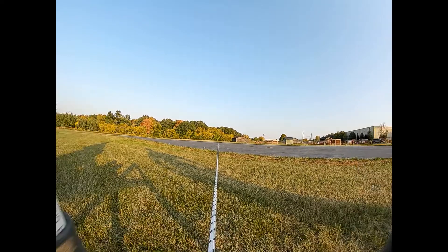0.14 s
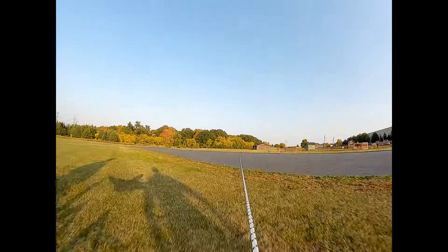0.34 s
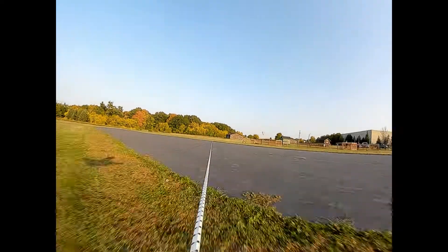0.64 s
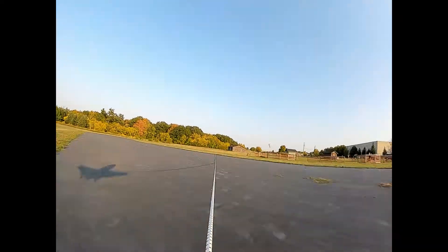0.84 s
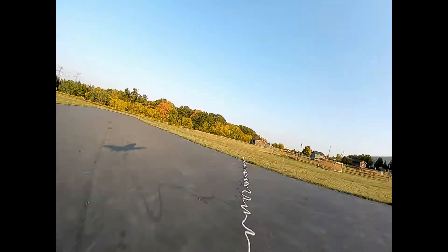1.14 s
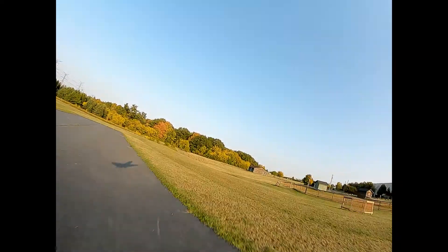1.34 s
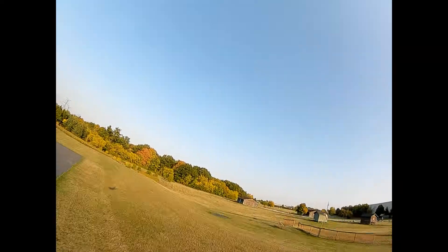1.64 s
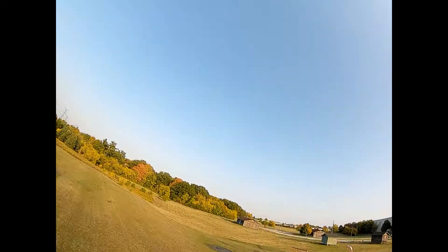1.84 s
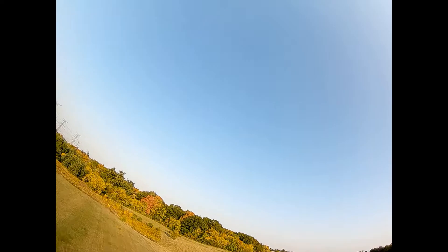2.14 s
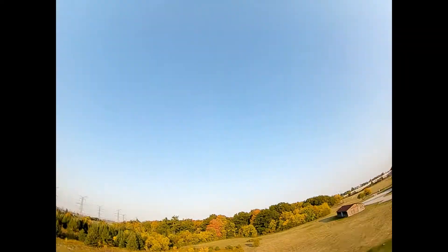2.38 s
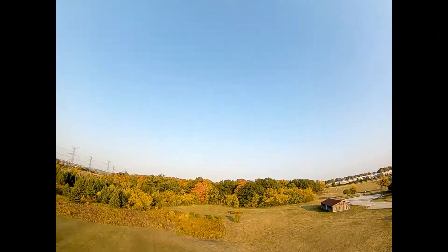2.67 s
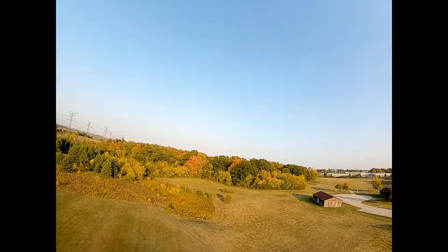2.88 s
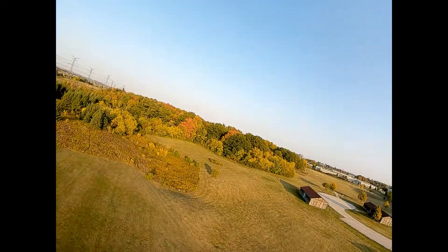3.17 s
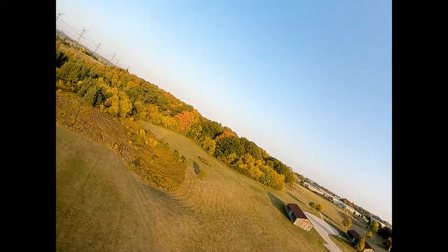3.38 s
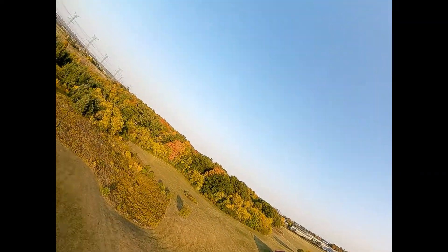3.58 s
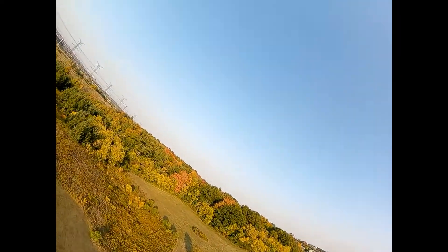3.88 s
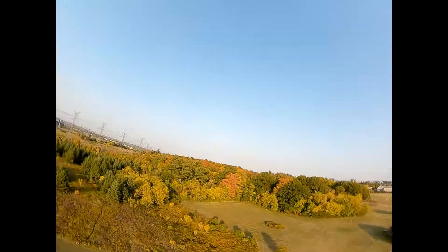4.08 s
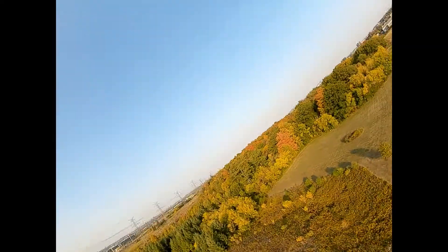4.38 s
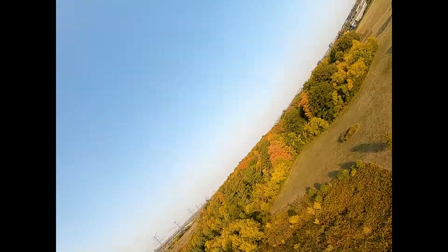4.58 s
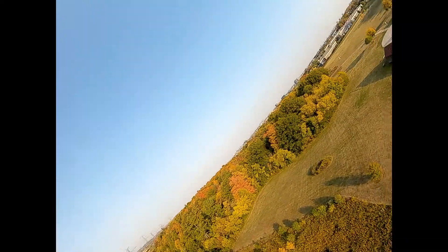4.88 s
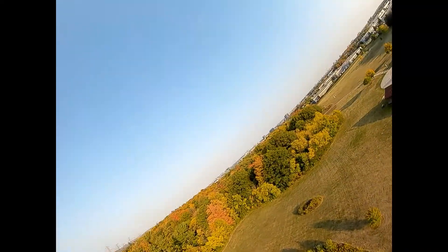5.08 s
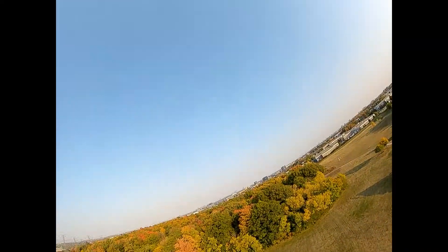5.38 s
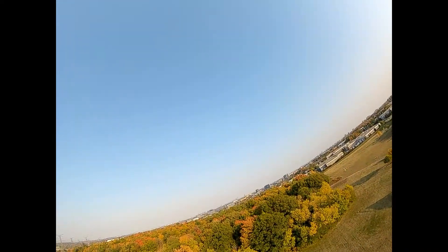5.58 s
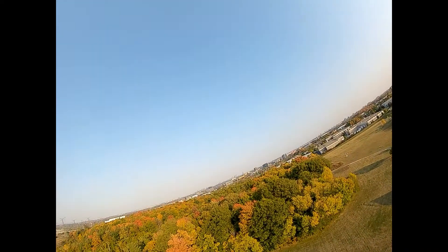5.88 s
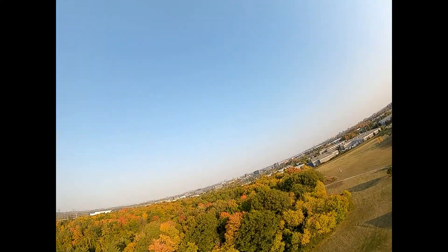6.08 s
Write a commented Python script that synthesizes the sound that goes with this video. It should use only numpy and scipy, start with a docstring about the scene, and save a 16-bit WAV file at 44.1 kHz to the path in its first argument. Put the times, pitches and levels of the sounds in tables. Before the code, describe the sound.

A small electric model plane knocks along its launch rails, then its motor whines up to a steady propeller drone in gusty wind.

```python
"""Model plane launch, heard on board

A bungee pulls a small electric plane off a plastic-pipe ramp; it scrapes and knocks on the rails.
The brushless motor speeds up while its controller whistles. Then shaft and propeller drone through
the foam body as rough air buffets it, with now and then a hollow hoot."""
import sys
import numpy as np
from scipy import signal
from scipy.fft import rfft, irfft, next_fast_len
from scipy.io import wavfile
from scipy.ndimage import uniform_filter1d

SR = 44100
rng = np.random.default_rng(int(sys.argv[2]) if len(sys.argv) > 2 else 0)


def dump_mix(stems):
    """Bounce the given channels to the path in sys.argv[1] as a 16-bit WAV at rate SR."""
    frames = np.atleast_2d(stems).T  # one column per channel
    limited = np.clip(frames, -1, 1)  # hard clip at full scale
    pcm = np.round(limited * 32767).astype(np.int16)
    wavfile.write(sys.argv[1], SR, pcm)


N = 274408
T = np.arange(N) / SR
MOTOR_START_S, FULL_THROTTLE_S = 0.584, 1.125
# Gusts in flight; each sound takes its own share: time_s, body_db, propeller_db, hiss_db
GUSTS = [(1.2, 3, 1, 1), (1.32, 5, 6.5, 2.5), (1.45, 2, -2, 2), (1.7, -0.5, -2.5, 1), (1.9, -1.5, -1, 4),
         (2.08, 1.5, 5, 4), (2.22, 2, 1, 2), (2.33, 2.5, -2.5, -0.5), (2.47, -1, -5.5, 0),
         (2.67, 2.5, 4.5, 3.5), (2.95, -1.5, -3.5, 0), (3.2, 0, -0.5, 1.5), (3.45, 6, 7.5, 3.5),
         (3.7, 1, 3, 3.5), (3.9, 3, 6, 5), (4.08, 2.5, 3, 5.5), (4.2, -5, -3, -2), (4.35, 2.5, 0.5, 1),
         (4.43, 10, 9.5, 7.5), (4.75, 10, 8, 4.5), (4.95, -0.5, -2, 1), (5.28, 1, 5, 3.5),
         (5.5, 3, -1.5, 1), (5.7, 0.5, -4, -3), (5.95, 1.5, -1, -1.5), (6.2, 6, 8.5, 7)]


def undb(db):
    """Turn decibels into a gain."""
    return 10 ** (np.asarray(db) / 20)


def curves(table):
    """Join a table's timed points into one line per column."""
    times, *columns = np.transpose(table)
    return [np.interp(T, times, column) for column in columns]


def wander(rate_hz):
    """A smooth random wobble, about 1 in size."""
    hold = int(SR / rate_hz)
    steps = np.repeat(rng.standard_normal(N // hold + 1), hold)
    return 1.237 * uniform_filter1d(uniform_filter1d(steps, hold), hold)[:N]


def tone(turns, db):
    """A sine wave at an average (rms) level, starting anywhere in its cycle."""
    return np.sqrt(2) * undb(db) * np.sin(2 * np.pi * (turns + rng.random()))


def noise(points, pulse=1):
    """Noise of rms 1, shaped by (pitch_hz, level_db) points and falling away outside them."""
    hz, db = np.transpose(points)
    size = next_fast_len(N)
    log_hz = np.log(np.fft.rfftfreq(size, 1 / SR) + 1)
    shape_db = np.interp(log_hz, np.log(np.r_[hz[0] / 2, hz, hz[-1] * 4]),
                         np.r_[db[0] - 20, db, db[-1] - 70])
    shaped = irfft(rfft(pulse * rng.standard_normal(N), size) * undb(shape_db), size)[:N]
    return shaped / np.sqrt(np.mean(shaped ** 2))


def shaft():
    """Shaft speed and turns so far; it trembles most while the slow rotor tugs past the magnets."""
    speed = [(.58, 12.6), (.724, 55.3), (.796, 83.8), (.868, 123), (.976, 173.8), (1.012, 193.4),
             (1.048, 205.7), (1.084, 210.7), (1.16, 215.65), (1.25, 217.1), (1.3, 216.43), (1.36, 214),
             (1.45, 213.41), (2, 212.16), (2.6, 210.31), (2.8, 208.65), (3.52, 208.65), (3.62, 211.8),
             (3.75, 212), (3.9, 211.38), (4.3, 212.86), (4.6, 213.35), (5.1, 212.31), (5.3, 212.58),
             (5.7, 212.01), (5.9, 210.89), (6.17, 211.05)]  # how fast it spins: time_s, speed_hz
    hz = uniform_filter1d(curves(speed)[0], size=900)
    hz = hz * (1 + 0.00046 * wander(14) + 0.0093 * (1 - hz / hz.max()) * wander(120))
    return hz, np.cumsum(hz) / SR


def motor(hz, turns):
    """Tones at k times the shaft speed: unbalance and blades drone, magnets passing coils whine."""
    strain = {5: 2, 7: 3, 8: 3.3, 10: 2.4, 12: 9.3, 16: 11, 18: 8, 24: 9.9, 28: 16, 30: 17, 34: 15}  # tones that grow while the motor pulls hard: multiple, extra_db
    rising, flying = run_up_levels(hz), flight_levels()
    in_flight = np.clip((T - FULL_THROTTLE_S) / 0.059 + 1, 0, 1)
    spin_db = 32 * np.log10(hz / hz.max())  # forces grow with speed
    chopping = np.clip((1.06 - T) / 0.063, 0, 1)  # the current turns smooth at full throttle
    # uneven magnets wobble the high tones once and twice a turn
    wobble = chopping * .4 * (np.sin(2 * np.pi * turns) + np.sin(4 * np.pi * turns)) / (2 * np.pi)
    out = 0
    for k in sorted({*rising, *flying}):
        flight_db = flying.get(k, -110)
        strain_db = chopping * (strain.get(k, 0) + .6 * body_boost_db(k * hz))
        early_db = rising.get(k, flight_db + spin_db + strain_db)
        db = (1 - in_flight) * early_db + in_flight * flight_db
        rasp_db = 4 * chopping * wander(110.45) if k > 6 else 0
        flutter_db = (.7 if k in (1, 42) else 2.6) * wander(32)  # uneven air meets the blades
        out = out + tone(k * turns + (k > 12) * wobble, db + flutter_db + rasp_db)
    return np.clip((T - MOTOR_START_S) / 0.018, 0, 1) * out


def body_boost_db(hz):
    """The foam body carries some pitches of the motor better than others."""
    mount = [(60, -12), (130, 7.5), (165, -4.5), (220, 4), (250, -1), (300, 6.5), (350, 0.5), (415, -17),
             (560, -5), (800, 0), (1200, -13), (1780, 3), (2250, 1), (2800, -2.5), (3450, 4), (4000, -5),
             (4500, 4), (5200, 3.5), (5800, -15), (6600, -5), (7300, -12.5), (8900, -9)]  # path from motor to microphone: pitch_hz, boost_db
    pitch_hz, boost_db = np.transpose(mount)
    return np.interp(np.log(hz), np.log(pitch_hz), boost_db)


def run_up_levels(hz):
    """Each rising tone swells and dips as it sweeps through the body's resonances."""
    # Rising tones: multiple, (base_at_half_speed_db, growth_db_per_doubling)
    run_up = {1: (-50.5, 12.3), 2: (-48, 6.8), 3: (-53.5, 0), 4: (-49.5, 0), 6: (-57, 3), 14: (-62, -2),
              21: (-53.5, -2.2), 42: (-54, -3.5), 63: (-68, -4)}
    shudder = [(.58, -13), (.64, -12), (.7, 7.5), (.735, 4.5), (.79, -14.5), (.86, 1.5), (.92, 3),
               (1.08, 2)]  # low tones shake as the rotor catches: time_s, change_db
    # Magnet tones are weaker until the controller chops faster: multiple, change_db
    soft_start = {21: -14, 42: -8.5, 63: -14}
    soft = np.clip((.75 - T) / 0.016, 0, 1)
    shudder_db = curves(shudder)[0]
    fade_db = -110 * np.maximum(T - 0.92, 0)  # two tones die away as the throttle opens
    return {k: db + growth * np.log2(2 * hz / hz.max()) + body_boost_db(k * hz)
            + (k <= 6) * shudder_db + soft_start.get(k, 0) * soft + (k in (21, 63)) * fade_db
            for k, (db, growth) in run_up.items()}


def flight_levels():
    """In flight every motor tone wavers, and the strong ones also swell with the gusts."""
    strong = {1: (-34.5, 0.063, 0.68), 2: (-43.5, 0.58, 1.35), 3: (-48.5, 0.06, 1.3),
              4: (-50.5, 0.089, 1.5), 8: (-50, .2, 1.4), 10: (-49, 0.071, 1.3), 42: (-65, .05, .8)}  # main tones: multiple, (level_db, gust_share, waver_db)
    weak = {5: -58, 6: -57, 7: -61, 9: -57, 11: -59.5, 12: -62, 13: -65, 14: -70, 16: -72, 17: -78.5, 18:
            -69.5, 20: -80, 21: -77.5, 22: -79, 23: -81, 24: -78, 26: -80, 28: -81.5, 30: -85.5, 31: -87.5,
            34: -87.5, 70: -102}  # faint tones: multiple, level_db
    # Multiples 2, 3 and 4 swell by turns: time_s, second_db, third_db, fourth_db
    swells = [(1.12, -5, -3, -6), (1.3, 6, 3.5, 3), (1.42, 3, 3.5, 4.5), (1.6, -1.5, -1.5, -7),
              (1.88, 0.5, -9, 9), (2.02, -4.5, 7, -4), (2.14, -3, 0, 7.5), (2.28, -9.5, -7.5, -1.5),
              (2.47, 0, 2, -17), (2.62, 2, -4, 2.5), (2.92, -5.5, 3, 1.5), (3.25, 1.5, 1, 3.5),
              (3.55, 2, 9, 2.5), (3.75, -1, 3.5, 9.5), (3.93, 1.5, 6, 2), (4.05, 2, -17, 6),
              (4.32, 4, 6, -4), (4.6, 5.5, 0.5, -10), (4.85, 4, 3.5, -7), (5.05, -1, 1.5, 0.5),
              (5.3, -0.5, 3, 8), (5.5, -7, -1, -6.5), (5.62, -2, 1.5, -8), (5.8, 3.5, 0.5, -2),
              (5.92, -1.5, 2.5, -9), (6.05, 4, 6, 4), (6.22, 6.5, 2.5, 1)]
    buzz = [(1.12, -4.5), (1.4, 1), (2.2, 0), (2.45, -9.5), (3.35, -9.5), (3.6, 0), (4.1, -1), (4.3, -9.5),
            (4.6, -4.5), (5.2, 2), (5.7, -5), (5.87, -14), (6.1, -7)]  # buzz of multiples 8 and 10: time_s, change_db
    whine = [(1.12, 0), (1.22, 4), (1.42, -4.5), (1.9, -1), (2.6, 2), (3.4, -1.5), (3.75, 1), (4.4, -4),
             (6.2, -1)]  # magnet whine, multiple 42: time_s, change_db
    gust_db, buzz_db, whine_db = (curves(table)[0] for table in (GUSTS, buzz, whine))
    second, third, fourth = curves(swells)
    change_db = {2: second, 3: third, 4: fourth, 8: buzz_db, 10: buzz_db, 42: whine_db}
    levels = {k: db + share * gust_db + waver_db * wander(6) + change_db.get(k, 0)
              for k, (db, share, waver_db) in strong.items()}
    for k, db in weak.items():  # the high ones come and go with the buzz
        levels[k] = db + 1.6 * wander(5.043) + (k > 15) * .6 * (buzz_db + 4)
    return levels


def slide_and_wind(turns):
    """Rails scrape, then wind gusts and pulses with each propeller turn; the blade tips hiss."""
    # Steady scraping as the plane slides along the rails, then wind rising as the motor speeds up:
    # time_s, rumble_db, roar_db, rush_db, hiss_db
    levels = [(0, -75, -84, -95, -99), (.12, -76, -84, -93, -99), (.15, -69, -61.5, -79, -94),
              (.42, -70, -63, -84, -95), (.5, -60, -63, -77, -99), (.56, -60, -60, -71, -86),
              (.6, -63, -58, -59, -76), (.67, -53, -60, -57, -73), (.72, -50, -51, -55, -70),
              (.78, -61, -57.5, -50.5, -62), (.9, -64, -46.5, -46.5, -55.5), (.96, -56, -48, -53, -57),
              (1.02, -55, -49.5, -43.5, -62), (1.1, -59, -55, -55.5, -72), (1.2, -62, -55, -50, -67)]
    shares = (0.49, 1.07, 1.03, 1.18)  # how much each band follows the gusts: rumble, roar, rush, hiss
    rumble = [(25, -8), (45, -4), (80, 0.5), (120, -1.5), (180, -5.5)]  # deep noise in the body: pitch_hz, level_db
    roar = [(160, -3), (280, 4), (520, 1.5), (660, -4), (735, -11.5), (820, -8.5), (950, -18)]  # rail scraping at first, later air on the body: pitch_hz, level_db
    rush = [(800, 1.5), (1000, -5), (1500, -3), (2100, -3.5), (2700, -14.5), (3400, -19)]  # higher noise, in flight from the blades: pitch_hz, level_db
    hiss = [(2900, -22), (3400, -3), (3700, -1.5), (4300, -3), (4600, -6.5), (5100, 0), (5700, -10.5),
            (6600, -8), (7100, -11), (7700, -16), (8400, -19), (9500, -22)]  # hiss through the motor mount: pitch_hz, level_db
    tip_hiss = [(8000, 0), (10000, -1.5), (12000, -4), (14000, -6), (15600, -4)]  # hiss of the blade tips: pitch_hz, level_db
    pulse_depths = (0.1, 0.23, 0.2, 0.18)
    shared_flutter_db, own_flutter_db = (0.38, 1.7, 2.1, 0.98), (2.4, 0.96, 1.1, 1.1)
    out, flutter = 0, wander(30)
    body_db, blades_db, hiss_db = curves(GUSTS) * np.clip((T - FULL_THROTTLE_S) / .08, 0, 1)
    bands = zip((rumble, roar, rush, hiss), curves(levels), (body_db, body_db, blades_db, hiss_db),
                shares, pulse_depths, shared_flutter_db, own_flutter_db)
    for points, db, gust_db, share, depth, shared_db, own_db in bands:
        band = noise(points, pulse=1 + depth * np.cos(2 * np.pi * turns))
        out = out + band * undb(db + share * gust_db + shared_db * flutter + own_db * wander(34))
    tip_db = np.interp(T, (.5, .75, 1.0), (-99, -86, -77.5))
    return out + noise(tip_hiss) * undb(tip_db + 0.53 * wander(1.2) + 1.6 * wander(8.3))


def knocks_and_ticks():
    """Each knock on the rails rings the body and scrapes briefly; ticks are tiny bursts of treble."""
    knocks = [(0.134, -61, -11, -72, 8.7), (0.153, -46.5, 7, -71, 17), (0.184, -44.5, -1.5, -53.5, 5.5),
              (0.232, -42, 7, -70, 10), (0.263, -29, -14, -47, 9.9), (0.267, -24, -5.5, -57, 11),
              (0.273, -29, -6, -63, 9.3), (0.282, -40, -6, -49, 14), (0.290, -23.5, -3.5, -43.5, 9.2),
              (0.298, -26.5, -14, -49, 6), (0.319, -35, 2, -44, 5.7), (0.328, -25, 8, -63, 5.8),
              (0.333, -32, 8, -63, 8.7), (0.355, -29, -2, -47, 13), (0.398, -36.5, 10, -67, 20),
              (0.455, -49, 9, -74, 12)]  # hits on the rails: start_s, peak_db, bass_db, scrape_db, scrape_fade_ms
    body = [(46, -10, 0.1), (117.2, 4, 0.16), (192, -13, 0.12), (265, 0, 0.075), (353, -3.5, 0.046),
            (542, -11.5, 0.036), (843, -13.5, 0.044)]  # notes the body rings at: pitch_hz, level_db, ring_s (to fall 60 dB)
    scrape = [(400, 3.5), (900, 0.5), (1900, -0.5), (2600, -13), (4000, -23.5), (7000, -30)]  # rubbing on the rails: pitch_hz, level_db
    ticks = [(0.187, -76), (0.362, -44.5), (0.412, -62), (0.416, -70), (0.511, -70), (3.513, -51)]  # sharp clicks: start_s, level_db
    rings, scrape_level, tick_level = np.zeros((3, N))
    t = np.arange(SR // 3) / SR
    hz, db, ring_s = np.transpose(body)[:, :, None]
    for start_s, peak_db, bass_db, scrape_db, fade_ms in knocks:
        chance = rng.standard_normal((len(body), 1))
        gain = undb(db + bass_db * (hz < 150) + 2.2 * chance)
        notes = gain * undb(-60 * t / ring_s) * np.sin(2 * np.pi * hz * t + 0.99 * chance)
        ring = notes.sum(axis=0) * (1 - np.exp(-t / 0.0013))  # foam softens the hit
        span = slice(int(start_s * SR), int(start_s * SR) + len(t))
        rings[span] += undb(peak_db) * ring / np.abs(ring).max()
        scrape_level[span] += undb(scrape_db) * (1 - np.exp(-t / 0.0019)) * np.exp(-t * 1000 / fade_ms)
    for start_s, level_db in ticks:
        first = int(start_s * SR)
        tick_level[first:first + len(t)] += undb(level_db) * np.exp(-t / 0.0011)
    treble = noise([(2500, -4), (4000, 6), (7000, 3), (9000, -18)])
    return rings + scrape_level * noise(scrape) + tick_level * treble


def hoots():
    """Gusts make a hollow space hoot: a narrow band of noise swells and fades."""
    gusts = [(2.064, 0.099, 740, -54), (2.704, 0.085, 730, -48.5), (3.875, 0.17, 748, -46.5),
             (4.65, 0.31, 697, -46.5), (5.307, 0.11, 748, -46.5)]  # one hoot each: middle_s, length_s, pitch_hz, level_db
    out = 0
    for middle_s, length_s, hz, db in gusts:
        swell = np.exp(-8 * ((T - middle_s) / length_s) ** 4)
        out = out + undb(db) * swell * noise([(hz - 60, -30), (hz, 0), (hz + 60, -30)])
    return out


def controller(turns):
    """Chopping the current makes a whistle; switching between coils adds tones on either side."""
    stages = [(0.478, 0.51, 7957), (0.51, 0.752, 7957), (0.745, 0.99, 11881), (0.99, 3.9, 11881)]  # whistles: start_s, end_s, pitch_hz
    # Each whistle and, relative to it, its side tones (counted in shaft multiples):
    # level_db, below_42_db, below_21_db, above_42_db
    levels = [(-88, -40, -40, -40), (-71, -30, -30, -26), (-72, -5, -7, -28), (-88, -40, -40, -40)]
    out = 0
    for (start_s, end_s, hz), (db, *sides_db) in zip(stages, levels):
        length_s = end_s - start_s
        gate = np.clip(np.minimum(T - start_s, end_s - T) / .003, 0, 1)
        fade_db = -22 * (T - start_s) / length_s
        sides = sum(tone(hz * T + k * turns, db + side_db + (k == -42) * fade_db + 5 * wander(60))
                    for k, side_db in zip((-42, -21, 42), sides_db))
        whistle = tone(hz * T, db + length_s * (0.5 * wander(9) + 0.05 * fade_db))
        out = out + gate * (whistle + sides)
    return out


def scene():
    """Everything reaches the microphone through the plane's body, with no echo."""
    hz, turns = shaft()
    mix = knocks_and_ticks() + motor(hz, turns) + controller(turns) + slide_and_wind(turns) + hoots()
    return mix[None]


def record(dry):
    """Cut away the highest treble."""
    top_hz = 15655
    return signal.sosfilt(signal.ellip(12, .2, 70, top_hz, fs=SR, output="sos"), dry)


dry = scene()
out = record(dry)
dump_mix(out)
```